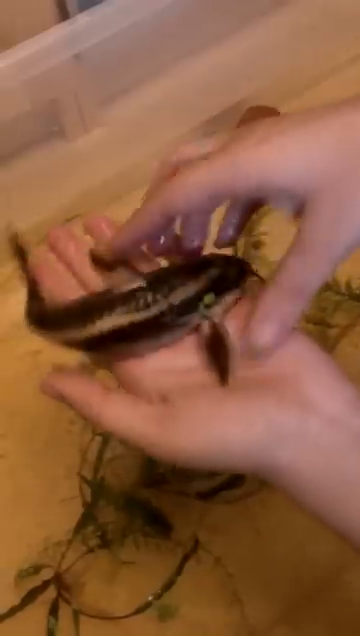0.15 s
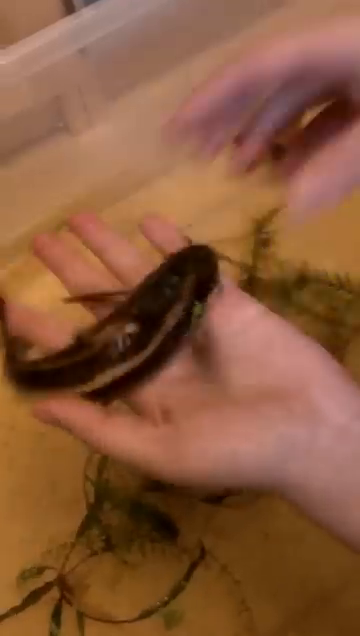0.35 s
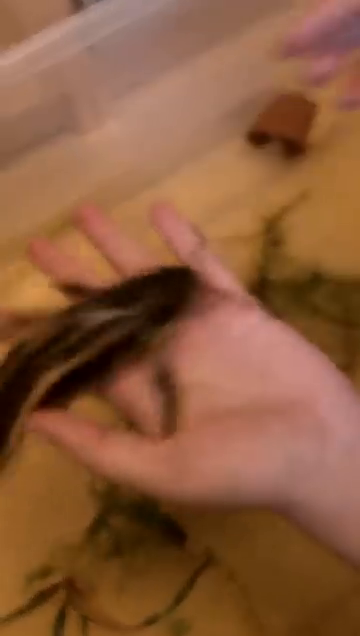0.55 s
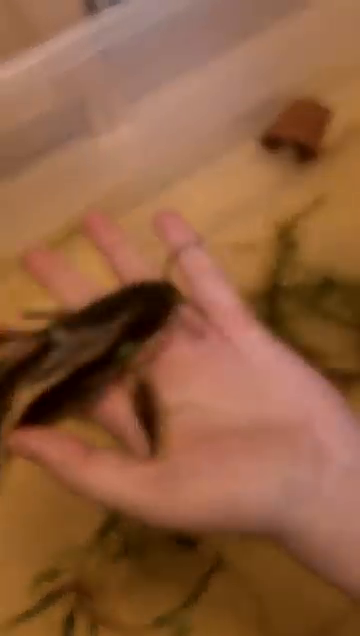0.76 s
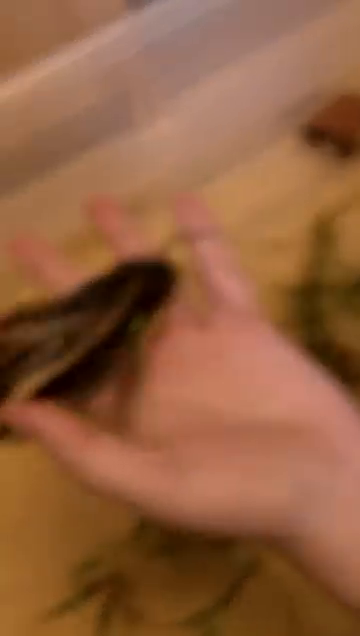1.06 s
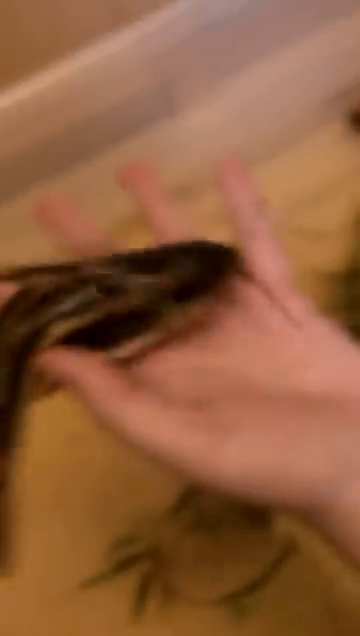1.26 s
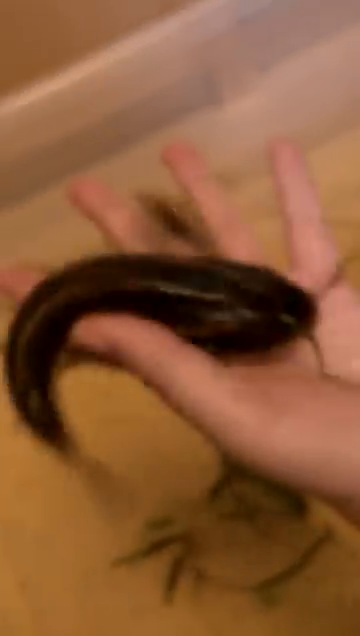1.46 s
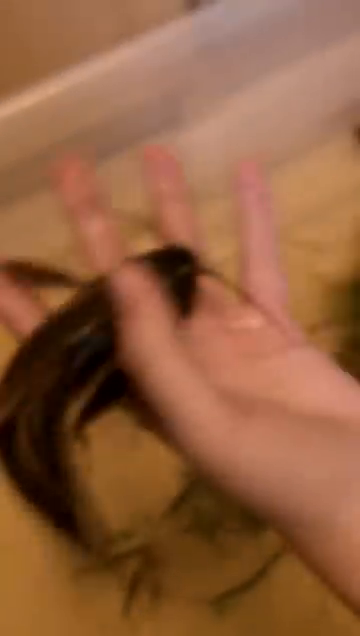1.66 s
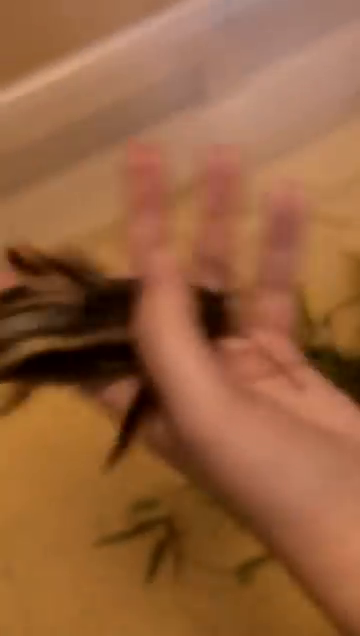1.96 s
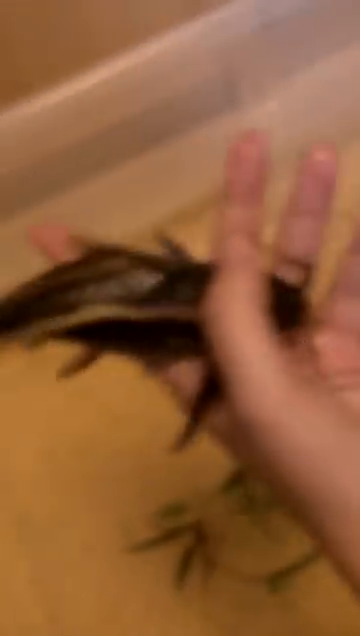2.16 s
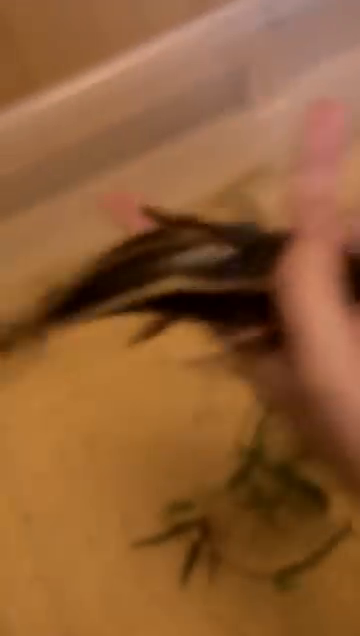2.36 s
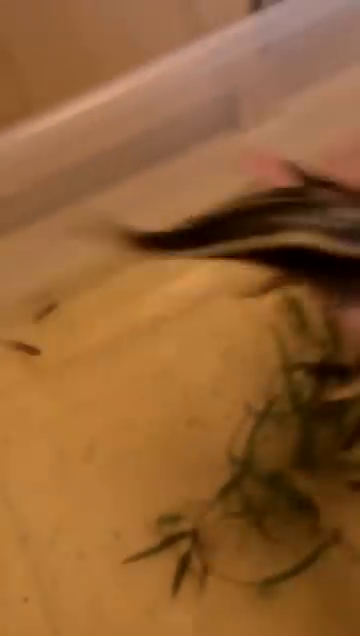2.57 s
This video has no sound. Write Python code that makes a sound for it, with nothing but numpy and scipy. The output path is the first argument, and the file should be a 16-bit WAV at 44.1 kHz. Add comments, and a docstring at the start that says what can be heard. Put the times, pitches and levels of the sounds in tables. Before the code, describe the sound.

Scratchy, squeaky croaks come in quick, uneven bursts from a catfish held indoors.

```python
"""In a small room, over a plastic water tub, a held catfish rasps by grinding its pectoral spines in
their sockets. The principle is stick-slip friction: each stroke is a run of clicks, one per ridge that
slips. Each click falls quickly in pitch and excites a short ring, squeaky in the middle strokes.
Sliding friction adds soft noise, and wet skin ticks faintly. The tub walls and the room reflect the
sound, over a faint steady hiss."""
import sys
import numpy as np
from scipy import signal
from scipy.fft import rfft, irfft
from scipy.io import wavfile
from scipy.ndimage import uniform_filter1d

SR = 44100
rng = np.random.default_rng(int(sys.argv[2]) if len(sys.argv) > 2 else 0)


def file_out(sig):
    """Save sig as 16-bit WAV at sys.argv[1]."""
    # one column per channel
    cols = np.atleast_2d(sig).T
    # limit, then scale
    lim = np.clip(cols, -1, 1)
    pcm = np.round(lim * 32767).astype(np.int16)
    wavfile.write(sys.argv[1], SR, pcm)


N = 119070

# Spectrum of the steady background: frequency_hz, level_db
HISS_SPECTRUM = [(30, -28.5), (70, -16), (130, -13), (230, -3), (390, -3.5), (560, -4), (1200, -7),
                 (3000, -12), (5000, -10.5), (8000, -10.5), (16000, -13)]
# Wet ticks from the hand and fish: start_s
TICK_TIMES = [.103, .214, .316, .929, 1.695, 1.852, 2.466]
# Slips of single ridges: start_s, click_level_db, ring_pitch_hz, ring_level_db
RIDGE_SLIPS = [(0.2363, -34.5, 4930, -40), (0.25, -30, 4850, -29.5), (0.261, -30, 4330, -31.5),
               (0.2667, -50, 4100, -34), (0.2698, -31, 4930, -26.5), (0.2747, -31, 4900, -41),
               (0.2784, -38, 4770, -32), (0.383, -37.5, 1710, -42.5), (0.3952, -33, 1710, -48),
               (0.4082, -31, 1600, -47), (0.4219, -33.5, 1790, -45), (0.4368, -31.5, 1520, -46),
               (0.448, -30, 1640, -50), (0.457, -32, 1640, -43.5), (0.514, -33, 1500, -41),
               (0.532, -33, 1590, -39), (0.6029, -43, 3470, -48), (0.6111, -43.5, 3700, -65),
               (0.6322, -45.5, 3920, -54), (0.7233, -35, 1610, -40), (0.7398, -33, 1720, -40),
               (0.7544, -32, 1740, -36.5), (0.767, -35, 1520, -41), (0.7775, -37.5, 1534, -39.5),
               (0.79, -48, 1500, -49), (0.841, -38.5, 1620, -47.5), (0.8524, -42.5, 1690, -45.5),
               (0.8916, -44.5, 1560, -80), (0.8992, -49, 1570, -73), (0.9924, -34, 1540, -40),
               (1.009, -31.5, 1496, -40.5), (1.0222, -29, 1553, -37), (1.037, -29.5, 1550, -38),
               (1.048, -31.5, 1474, -39), (1.093, -47, 2260, -50), (1.1008, -45, 2370, -64),
               (1.112, -39, 2410, -44.5), (1.1252, -38, 2250, -68), (1.1372, -39.5, 2240, -66),
               (1.1518, -43, 2350, -54), (1.175, -44, 2300, -51.5), (1.2514, -35, 1450, -43),
               (1.267, -30.5, 1500, -41), (1.279, -32.5, 1530, -39.5), (1.2939, -30.5, 1510, -42),
               (1.309, -31, 1410, -38), (1.318, -31, 1420, -41.5), (1.358, -44, 3870, -33.5),
               (1.3693, -38.5, 4020, -33.5), (1.38, -36.5, 3650, -32), (1.3891, -35.5, 3550, -46),
               (1.4, -33.5, 3510, -25), (1.4133, -29.5, 3140, -23), (1.424, -31, 3220, -27),
               (1.434, -34.5, 3480, -29.5), (1.4818, -38, 4270, -29.5), (1.495, -35.5, 3680, -28.5),
               (1.5094, -32, 3000, -26.5), (1.5224, -34, 2610, -31), (1.5382, -27, 2424, -23),
               (1.5527, -31, 2360, -24.5), (1.562, -34.5, 2300, -27.5), (1.5695, -29, 1930, -37.5),
               (1.5747, -52, 2170, -40), (1.6055, -34.5, 2280, -35.5), (1.6176, -31, 2260, -39),
               (1.6303, -32, 2340, -66), (1.648, -32, 5360, -23), (1.6669, -37, 4450, -36),
               (1.7627, -52, 3730, -51), (1.7757, -47, 4130, -39.5), (1.787, -42, 4100, -42.5),
               (1.7975, -53, 4170, -39), (1.806, -53, 4360, -40), (1.8848, -38.5, 4340, -39),
               (1.894, -37, 4500, -40), (1.9058, -38, 4500, -37), (1.918, -31, 4000, -36),
               (1.9286, -35.5, 4400, -32), (1.936, -31, 4140, -29), (1.9422, -35, 4430, -26.5),
               (1.9493, -34, 4110, -30.5), (1.9559, -32.5, 3980, -27), (1.964, -38.5, 3880, -29),
               (1.9735, -31, 3580, -30), (1.9838, -42, 3350, -34.5), (2.032, -37.5, 3400, -29),
               (2.044, -33, 3260, -33), (2.0548, -33, 2940, -42), (2.0659, -31, 2870, -29),
               (2.0791, -31, 740, -47), (2.0947, -31, 774, -50.5), (2.1068, -32, 750, -53),
               (2.115, -32, 740, -53), (2.165, -49.5, 3330, -50), (2.176, -47.5, 3470, -50),
               (2.183, -45, 3430, -46), (2.1931, -46.5, 3300, -56), (2.202, -46.5, 3350, -57),
               (2.2105, -45, 3500, -57), (2.221, -48.5, 3530, -52), (2.232, -51, 3440, -58),
               (2.33, -38.5, 710, -65.5), (2.341, -36, 710, -51), (2.351, -34, 683, -48),
               (2.3619, -32.5, 750, -52), (2.3733, -33.5, 710, -53), (2.3884, -31, 728, -40),
               (2.3983, -31.5, 730, -45), (2.4058, -39, 670, -54), (2.4855, -51, 1256, -54),
               (2.497, -47, 1220, -54.5), (2.5096, -44.5, 1150, -51), (2.521, -43, 1230, -49.5),
               (2.53, -41.5, 1134, -64.5), (2.537, -47, 1080, -67), (2.547, -50, 1350, -66),
               (2.5618, -49.5, 1250, -81.5)]
# Strokes of the spine, with five band levels relative to the 5200 Hz band:
# start_s, bass_db, low_db, mid_db, upper_db, treble_db, friction_db
SPINE_STROKES = [(.23, -1, -21.5, -8, -12, -5.5, -17), (.38, -7, 1.5, 5, -6.5, 5.5, -18),
                 (.51, 8.5, -5.5, -1.5, 1, 5.5, -2.5), (.59, 2, -20, -14, -6.5, 3, -6),
                 (.72, 3, -0.5, -7, -7.5, -2, -34), (.83, 10, 3, 5.5, -2.5, 3, -4),
                 (.99, 4.5, 4, -7, -3.5, -2.5, -12), (1.09, 9, 4, 4, -3, -2, -4),
                 (1.24, 8, -4, 3.5, -5, -1.5, -7.5), (1.35, 8, -1, 2.5, -2.5, 0, -19.5),
                 (1.47, 4, 3.5, 4, 4.5, -2, -7), (1.6, -2, -3.5, 5, -0.5, -4, -25),
                 (1.64, -23, -2.5, 2, -3.5, -1.5, -8), (1.76, 7, -0.5, -7.5, -2.5, 3.5, 1),
                 (1.88, 0.5, -0.5, -6.5, -2, -3.5, -18), (2.03, 2.5, 17.5, 8, 5.5, 3, -13),
                 (2.07, -12, 6, 2, -5.5, -3, -18), (2.16, -9.5, 7.5, 4.5, 2, 6, -9.5),
                 (2.32, -9.5, 14, 7.5, 1.5, 3, -11), (2.48, 2, 2, 3, 4, 5, -6.5)]
# Centres of the bass, low, mid, upper, reference and treble bands: frequency_hz
STROKE_BANDS = [330, 700, 1500, 2900, 5200, 7500]
# Spectrum common to all clicks: frequency_hz, level_db
CLICK_SPECTRUM = [(40, -41.5), (130, -41), (250, -28.5), (430, -21.5), (560, -11.5), (690, -9), (900, -12),
                  (1500, -8.5), (2000, -5.5), (3000, -1.5), (3800, -3.5), (5400, 2), (6800, -11),
                  (9100, -16), (10400, -23.5), (13000, -25), (16000, -34.5)]
# Slides where the spine does not catch: centre_s, half_width_s, level_db
SLIDES = [(0.375, 0.0094, -57), (0.502, .014, -52.5), (0.597, 0.014, -58.5), (0.828, 0.0092, -54.5),
          (1.364, 0.016, -51), (2.168, 0.01, -50.5), (2.5, 0.015, -47)]
# Spectrum of those slides: frequency_hz, level_db
SLIDE_SPECTRUM = [(200, -28.5), (700, -2.5), (2000, -4), (3500, -1), (5500, -6), (8800, -16), (16000, -47)]

HISS_DB, TICK_DB, TICK_DECAY_S = -69.5, -60, 0.0022
CLICK_TRIM_DB, RING_TRIM_DB, LEVEL_WINDOW_S = -0.84, -2.5, 0.0038  # slip levels are rms over this window
LAG_S, LAG_HZ, LAG_SCATTER = 0.001195, 6000, 0.1033  # the lows of a click come later than its highs
SWOOP_S, SWOOP_HZ, SWOOP_WIDTH_HZ = 0.0022, 4200, 1000  # further delay around a resonance
GRIT_DB, GRIT_S = -0.5, 0.0022  # each slip crumbles into a burst of smaller ones
RIPPLE_DB, FRESH_DB = 0.24, -4  # random colour of a click; the part of a click new at each ridge
RING_DECAY_CYCLES, RING_MAX_DECAY_S, RING_RISE_S, RING_LAG_S = 4.04, 0.0032, 0.0011, 0.000835
RING_BEND, BEND_S = 0.23, 0.0006  # a ring starts flat by this fraction and bends up
CLICK_ECHO_DB, RING_ECHO_DB, TUB_GAP_S, TUB_DECAY_S = -7, -6.5, 0.0025, 0.0079
ROOM_DB, ROOM_GAP_S, ROOM_T60_S = -14.5, 0.0086, 0.13


def undb(db):
    """Amplitude grows tenfold for every 20 decibels."""
    return 10 ** (np.asarray(db) / 20)


def unit_energy(x):
    """Normalisation: the squared samples sum to one."""
    return x / np.sqrt(np.sum(x ** 2))


def spectral_gain(hz, spectrum):
    """A spectral envelope, interpolated in decibels over log frequency, gives the gain at hz."""
    knots_hz, db = np.array(spectrum, float).T
    return undb(np.interp(np.log(hz + 1), np.log(knots_hz), db))


def add(out, x, start_s):
    """Superposition: x adds to out from start_s on."""
    i = max(int(start_s * SR), 0)
    out[i:i + len(x)] += x[:len(out) - i]


def hiss(spectrum):
    """Spectral shaping colours white noise into a steady hiss of rms 1."""
    gain = spectral_gain(np.fft.rfftfreq(N, 1 / SR), spectrum)
    x = irfft(rfft(rng.standard_normal(N)) * gain, N)
    return x / np.std(x)


def skin_ticks(size=400):
    """Wet skin gives tiny transients: decaying noise, brightened by differentiation."""
    out = np.zeros(N)
    decay = np.exp(-np.arange(size) / SR / TICK_DECAY_S)
    for start_s in TICK_TIMES:
        burst = np.diff(rng.standard_normal(size + 1)) * decay
        add(out, undb(TICK_DB) * burst, start_s)
    return out


def diffuse_echoes(envelope, passes=4, window=48):
    """A diffuse field: dense reflections under an envelope, with no single pitch ringing on."""
    x = rng.standard_normal(len(envelope)) * envelope
    for _ in range(passes):
        flat = irfft(np.exp(1j * np.angle(rfft(x))), len(x))
        local_energy = np.convolve(flat ** 2, np.ones(window), "same")
        x = flat * envelope / np.sqrt(local_energy)
    return unit_energy(x)


def room(x):
    """Reverberation: the reflections of a small room follow the direct sound and decay exponentially."""
    t = np.arange(SR // 5) / SR
    tail = diffuse_echoes(np.exp(-np.log(1000) * t / ROOM_T60_S) * (t > ROOM_GAP_S))
    return x + undb(ROOM_DB) * signal.oaconvolve(x, tail)[:N]


def ridge_click(tint, size=2048, knots=28):
    """Group delay sweeps the snap of a ridge down from its highs to a resonance; it starts mid-buffer."""
    hz = np.fft.rfftfreq(size, 1 / SR)
    ripple = np.interp(np.sqrt(hz), np.linspace(0, np.sqrt(SR / 2), knots), rng.standard_normal(knots))
    gain = spectral_gain(hz, CLICK_SPECTRUM) * spectral_gain(hz, tint) * undb(RIPPLE_DB * ripple)
    delay = LAG_S * np.exp(-hz / LAG_HZ) + SWOOP_S / (1 + ((hz - SWOOP_HZ) / SWOOP_WIDTH_HZ) ** 2)
    delay *= np.exp(LAG_SCATTER * rng.standard_normal())
    phase = 2 * np.pi * (np.cumsum(delay) * SR / size + rng.random())
    age = np.arange(size) / SR / GRIT_S
    micro_slips = unit_energy(rng.standard_normal(size) * np.sqrt(age) * np.exp(-age ** 2))
    grit = 1 + undb(GRIT_DB) * rfft(micro_slips)
    snap = irfft(gain * grit * np.exp(-1j * phase))
    return unit_energy(np.roll(snap, size // 2))


def spine_ring(pitch_hz, size=1400):
    """Damped free vibration: the spine and body ring for a few cycles after a slip."""
    t = np.arange(size) / SR
    bent_hz = pitch_hz * (1 - RING_BEND * np.exp(-t / BEND_S))
    decay_s = min(RING_DECAY_CYCLES / pitch_hz, RING_MAX_DECAY_S)
    envelope = (1 - np.exp(-t / RING_RISE_S)) ** 2 * np.exp(-t / decay_s)
    phase = 2 * np.pi * (np.cumsum(bent_hz) / SR + rng.random())
    return unit_energy(envelope * np.sin(phase))


def tub(x, echo_db, size=1500):
    """Early reflections from hand, water and tub walls, drawn anew each time because the fish moves."""
    t = np.arange(size) / SR
    direct = t == 0
    echoes = diffuse_echoes(np.exp(-t / TUB_DECAY_S) * (t > TUB_GAP_S))
    return signal.fftconvolve(x, direct + undb(echo_db) * echoes)


def scrape(stroke, tint, smooth_s=0.028):
    """Friction between the ridges makes noise that follows the amplitude and colour of the stroke."""
    width = int(smooth_s * SR)
    effort = uniform_filter1d(np.abs(stroke), width, origin=width // 4)
    spectrum = [(hz, db + 20 * np.log10(spectral_gain(hz, tint))) for hz, db in CLICK_SPECTRUM]
    return effort * hiss(spectrum)


def catfish_rasp():
    """Stridulation: in each stroke the ridges stick and slip in turn, each with a click and a ring."""
    out = np.zeros(N)
    ends = [row[0] for row in SPINE_STROKES[1:]] + [N / SR]
    for (start_s, bass, low, mid, upper, treble, friction_db), end_s in zip(SPINE_STROKES, ends):
        tint = list(zip(STROKE_BANDS, [bass, low, mid, upper, 0, treble]))
        stroke = np.zeros(N)
        shared_click = ridge_click(tint)
        for slip_s, click_db, pitch_hz, ring_db in RIDGE_SLIPS:
            if start_s <= slip_s < end_s:
                snap = unit_energy(shared_click + undb(FRESH_DB) * ridge_click(tint))
                click = undb(click_db + CLICK_TRIM_DB) * tub(snap, CLICK_ECHO_DB)
                ring = undb(ring_db + RING_TRIM_DB) * tub(spine_ring(pitch_hz), RING_ECHO_DB)
                add(stroke, click, slip_s - len(snap) / 2 / SR)
                add(stroke, ring, slip_s + RING_LAG_S)
        out += stroke + undb(friction_db) * scrape(stroke, tint)
    return out * np.sqrt(LEVEL_WINDOW_S * SR)


def spine_slides():
    """Sliding friction: soft swells of noise where the spine moves without catching."""
    t = np.arange(N) / SR
    swells = sum(undb(db) * np.exp(-((t - centre_s) / half_s) ** 2) for centre_s, half_s, db in SLIDES)
    return swells * hiss(SLIDE_SPECTRUM)


def scene():
    """The sounds of the fish superpose and reverberate in the room, over the steady hiss, in mono."""
    fish = catfish_rasp() + spine_slides() + skin_ticks()
    return (room(fish) + undb(HISS_DB) * hiss(HISS_SPECTRUM))[None]


def record(dry, cutoff_hz=16300):
    """Low-pass filtering steeply attenuates the highest treble."""
    return signal.sosfilt(signal.ellip(10, .1, 70, cutoff_hz, fs=SR, output="sos"), dry)


dry = scene()
out = record(dry)
file_out(out)
```